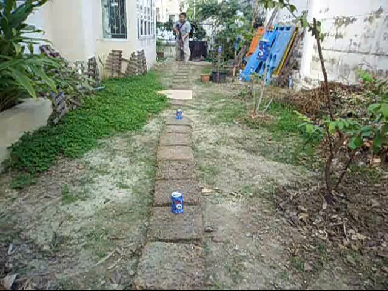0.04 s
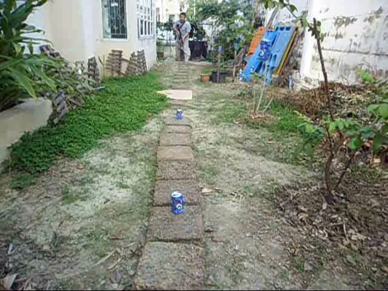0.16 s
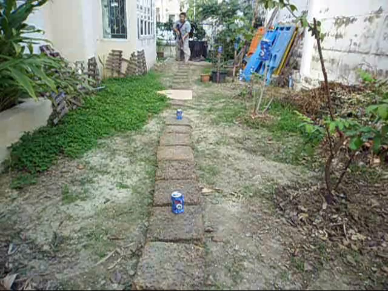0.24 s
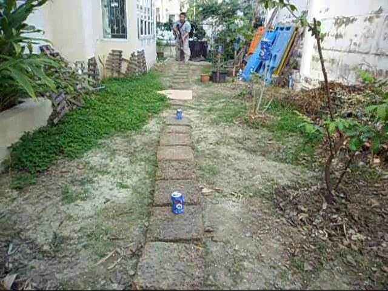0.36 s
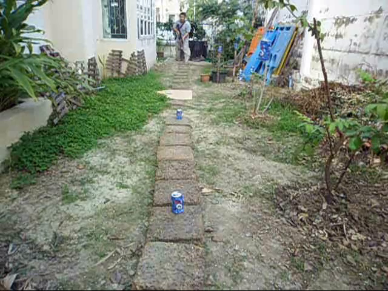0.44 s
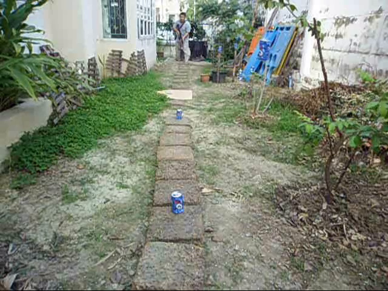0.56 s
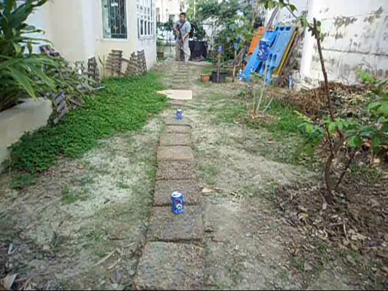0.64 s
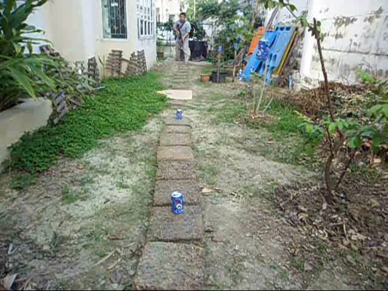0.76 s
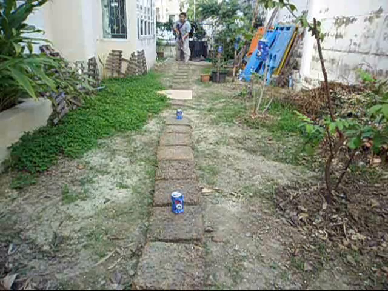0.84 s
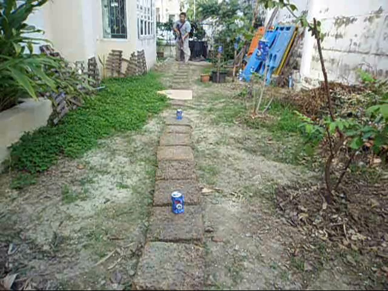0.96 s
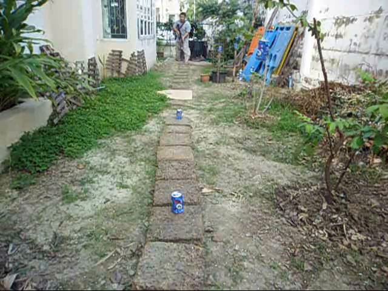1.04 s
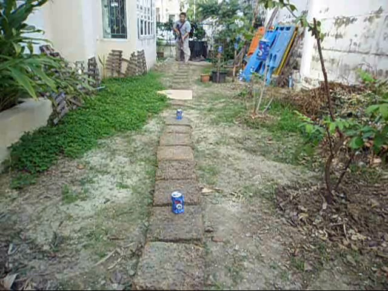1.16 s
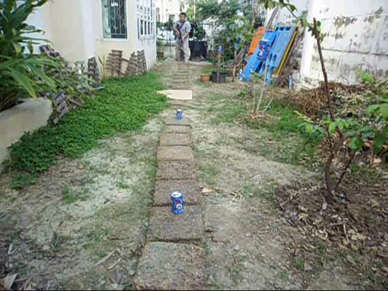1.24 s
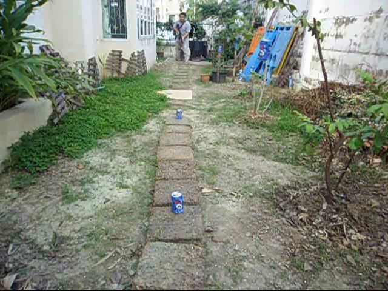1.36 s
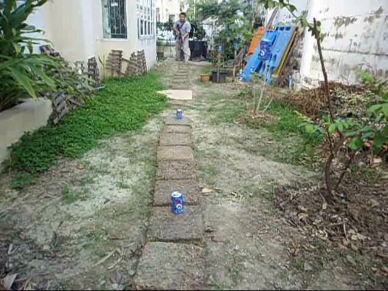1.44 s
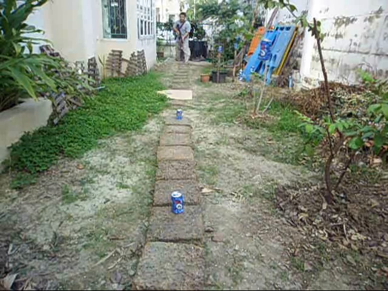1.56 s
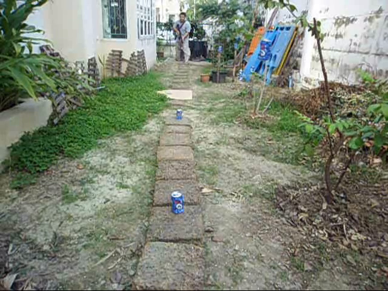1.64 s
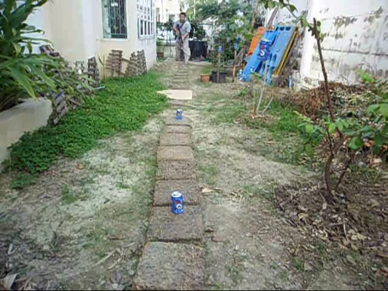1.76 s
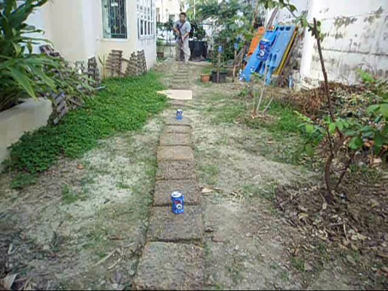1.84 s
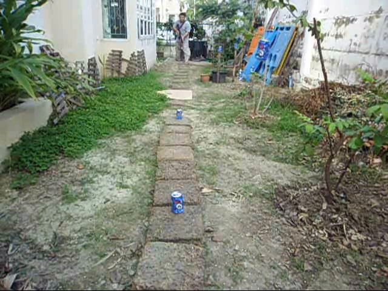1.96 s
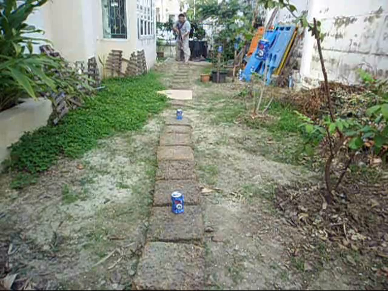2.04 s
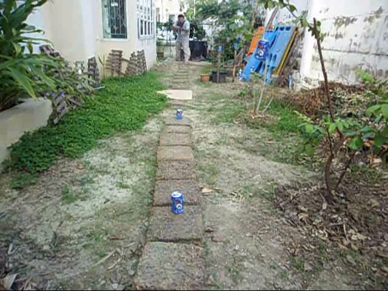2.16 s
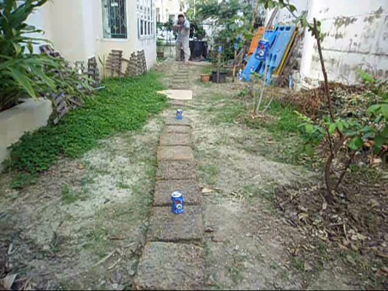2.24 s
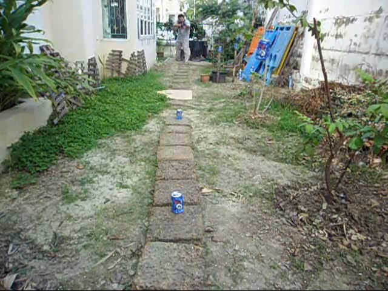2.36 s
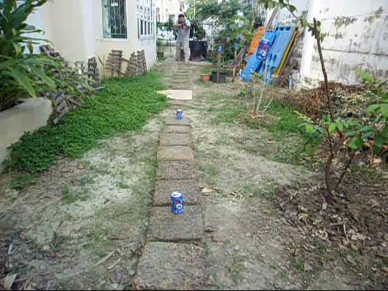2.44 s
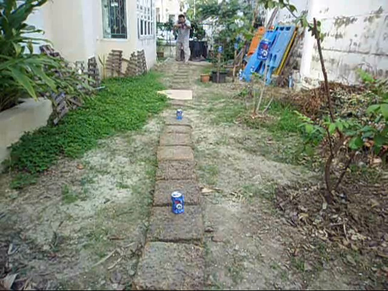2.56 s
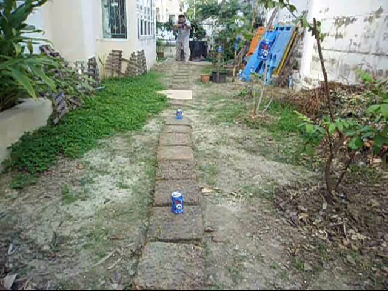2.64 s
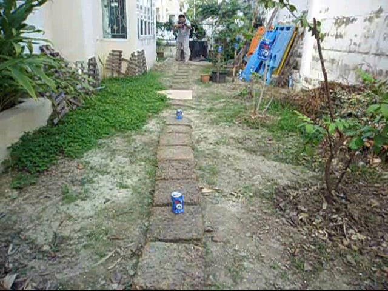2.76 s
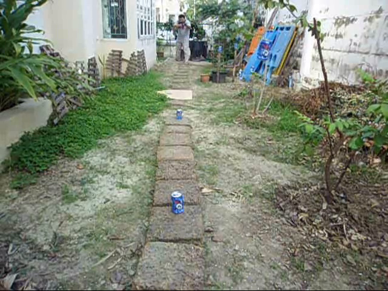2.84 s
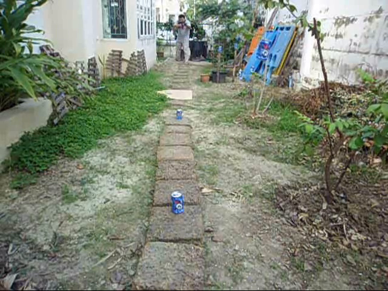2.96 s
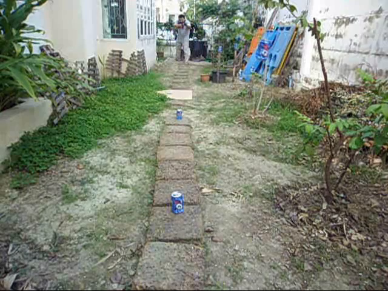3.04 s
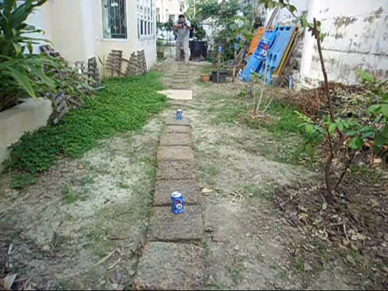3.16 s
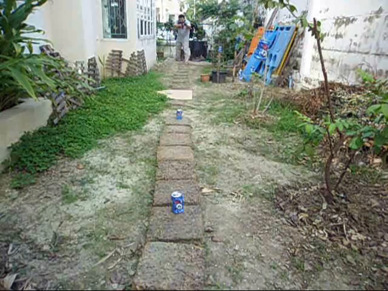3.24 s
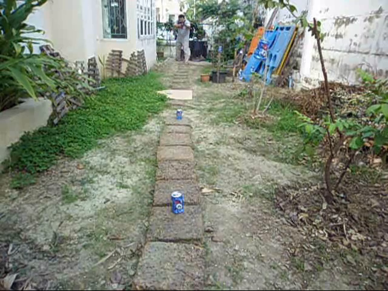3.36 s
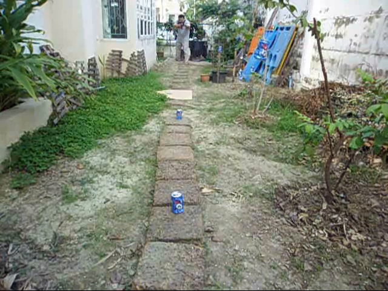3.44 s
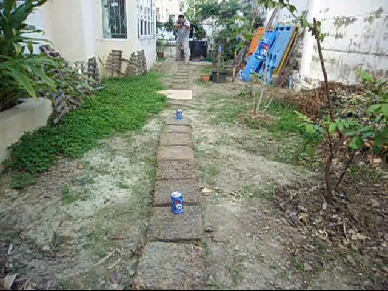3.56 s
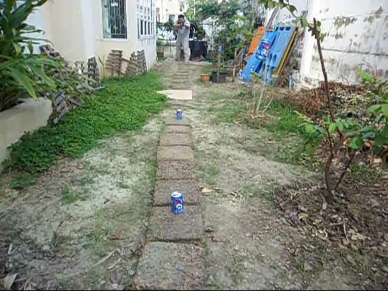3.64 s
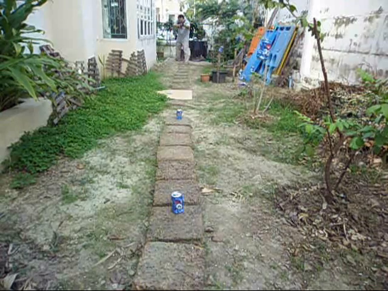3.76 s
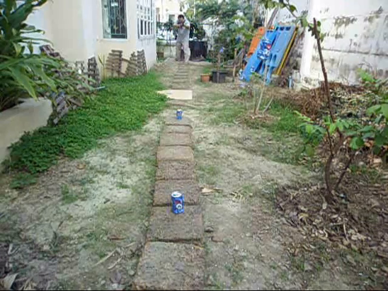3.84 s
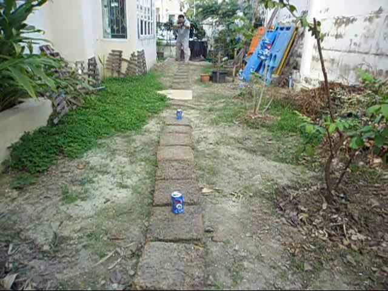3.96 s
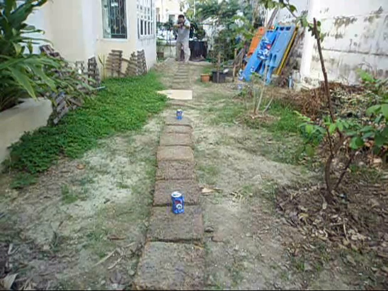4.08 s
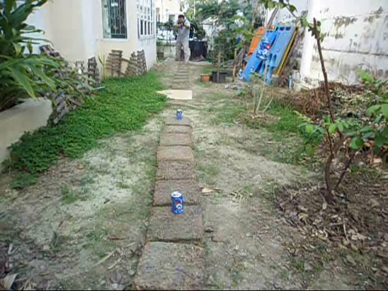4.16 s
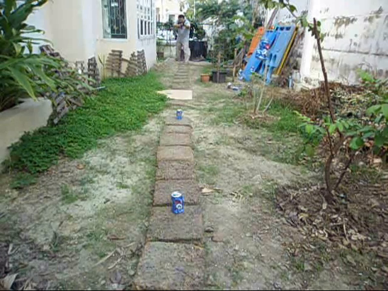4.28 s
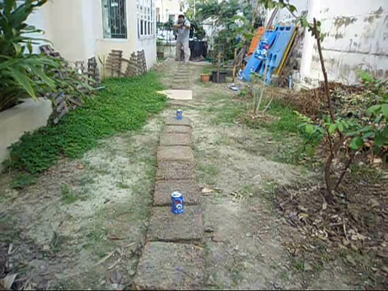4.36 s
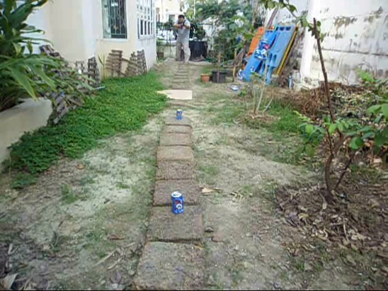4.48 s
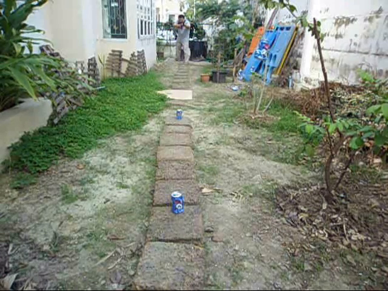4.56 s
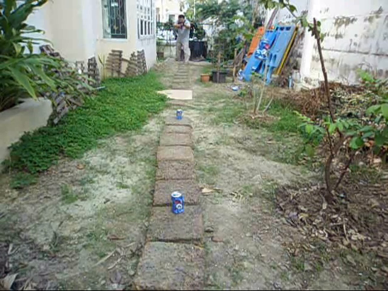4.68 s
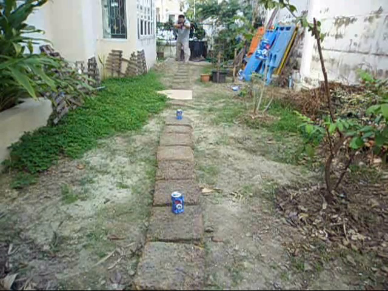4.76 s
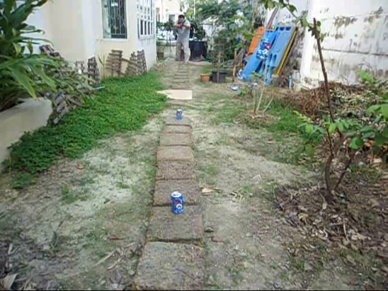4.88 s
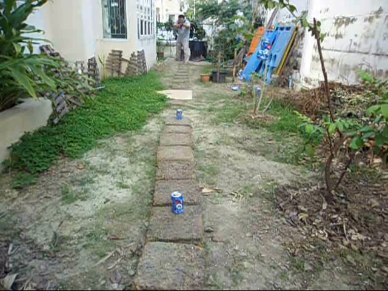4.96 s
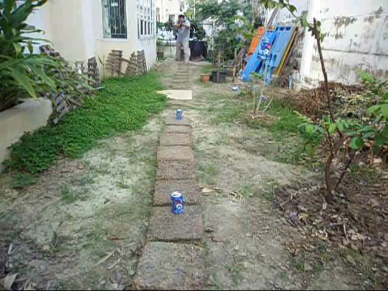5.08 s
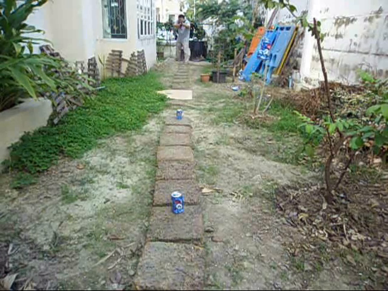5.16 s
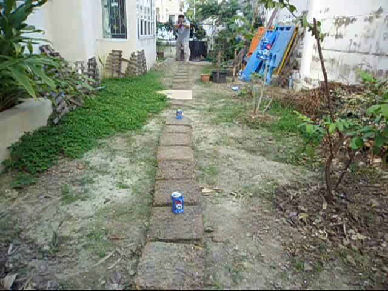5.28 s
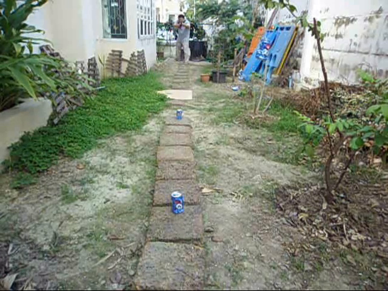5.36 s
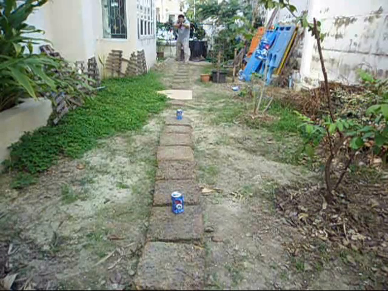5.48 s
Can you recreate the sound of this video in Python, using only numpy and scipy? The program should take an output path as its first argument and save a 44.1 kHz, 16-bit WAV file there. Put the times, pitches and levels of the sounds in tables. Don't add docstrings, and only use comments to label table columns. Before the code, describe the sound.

A small mono microphone in a narrow walled yard picks up a low fan hum, soft wind and a faint insect drone. Cloth rustles and fittings clink as a rifle is raised. Then five single electric airsoft shots snap out, most cracking loudly onto cans or sheet metal, distorting and ringing off the walls. Knocked cans clatter, a can rolls and pellets bounce before a duller last shot.

```python
import sys
import numpy as np
from scipy import signal
from scipy.io import wavfile

SR = 44100
rng = np.random.default_rng(int(sys.argv[2]) if len(sys.argv) > 2 else 0)


def convert_level_to_amplitude(level_db):
    exponent = np.asarray(level_db, float) / 20
    return 10 ** exponent


def unload_wav(signal):
    wavfile.write(
        sys.argv[1],
        SR,
        np.round(np.clip(np.atleast_2d(signal).T, -1, 1) * 32767).astype(np.int16),
    )


N = 242991

# (time [s], peak [dB], brightness [dB per octave], wall echo [dB], body [dB])
PISTON_SLAPS = [
    (3.3288, -1.5, 0.0, -7, 0.0),
    (3.8570, -.5, 4.0, -6, -3.0),
    (4.3012, -3.5, 0.0, -6.5, 0.0),
    (4.7230, -.5, 3.5, -5.5, -2.0),
    (5.4818, -5.5, 0.3, -2.5, 0.0),
]
# (time [s], peak [dB], brightness [dB per octave], wall echo [dB], body [dB])
PELLET_STRIKES = [
    (3.3475, 6, .5, -1, 1),
    (3.875, 9, 1, -1.5, 0.5),
    (4.3283, -7.5, -2, 1.5, -2),
    (3.984, -9, 1.5, -16, 0.0),
    (4.342, 2.5, 4, -10, 2.5),
    (4.7499, 7, -1.5, -2, 0.5),
]
# (time [s], peak [dB], brightness [dB per octave], wall echo [dB], body [dB])
BOUNCES = [
    (2.357, -23, 3, -14, -8),
    (3.266, -24, -2, 2, 5),
    (5.176, -6, -0.8, -6, -3),
    (5.195, -18.5, -1.4, -7, -3),
    (5.2385, -12, -2.5, -4, 9.5),
    (5.418, -19, -1, -1, -3.0),
]
# (time [s], peak [dB], brightness [dB per octave], wall echo [dB], body [dB])
TUMBLES = [
    (3.781, -8, .5, -1, 1.5),
    (3.820, -14, -1, 1.5, -2),
    (3.583, -28, 2, 6, -13),
    (3.618, -24, 0.5, 1.5, -13),
    (3.633, -18, -0.5, -5, -13),
    (4.608, -30.5, -0.5, 5.5, 8.5),
    (4.654, -28, -2, -0.5, 5.5),
    (4.50, -27, -2.5, 3.5, 4),
    (4.12, -25, -1, 1.5, -17),
]
REBOUND_TIMES = [
    4.3614,
    4.3874,
    4.402,
]
# (frequency [Hz], level [dB per Hz])
SLAP_COLOUR = [(88, -1), (150, -7), (338, -8.5), (1340, -3.5), (1760, -3), (2440, -4), (3810, -1),
               (4810, 1), (6430, -3), (8120, 0), (10900, -7.5), (15400, -13.5)]
# (frequency [Hz], level [dB per Hz])
CRACK_COLOUR = [(88, -6), (150, -10), (560, -10.5), (605, -5), (654, -8.5), (1370, -2), (2090, -4),
                (5300, -1), (7960, -2), (10400, -6.5), (15400, -22)]
# (frequency [Hz], t60 [s])
YARD_T60 = [(150, 0.21), (500, 0.46), (1200, 0.64), (3000, 0.58), (6000, 0.42), (10000, 0.46),
            (15000, 0.77)]
# (frequency [Hz], level [dB])
FAR_WALLS = [(150, -16.5), (400, -25.5), (1000, -16.5), (4000, -28.5), (15000, -30)]
# (time [s], blow [dB], modes (frequency [Hz], level [dB], t60 [s]))
CANS = [
    (3.35, -8.5, [(924, -4, .3), (1200, -4.5, 0.6), (1413, 1.5, 0.25), (2520, 3, 0.1), (3499, 0.5, 0.37), (5300, -10, .2)]),
    (3.578, -28, [(2280, 0.0, .5), (3235, -6, .4)]),
    (3.622, -25, [(2060, -1, .3), (2180, -4, .25), (3235, -3, .35), (5500, -4, .2), (1545, -3, .1), (4000, -3, .3), (3400, -3, .3)]),
    (3.786, -18, [(925, 2, .15), (1028, -2, 0.34), (2094, -9, 0.37), (3890, 8, 0.14), (5141, 2, 0.15)]),
    (3.879, -7.5, [(110, 2, 0.093), (855, -7, 0.44), (1030, -11.5, 0.78), (1520, -9.5, 0.76), (3240, 0, 0.22), (3977, -1.5, 0.23), (5250, -2.5, 0.43)]),
        (4.343, -16.5, [(1303, -3, 0.31), (2148, -14, 0.43), (3343, -4, 0.5), (3436, 2, .45), (1012, -11, 0.66), (5087, 0, 0.15), (680, -2, .2)]),
    (4.61, -26.5, [(1150, 0, .1), (3600, -12, 0.4), (6700, -7, 0.17), (8900, -9, 0.11)]),
    (4.75, -8, [(127, -4.5, 0.087), (1046, -7.5, 0.42), (1346, 3, 0.43), (1572, -1.5, 0.54), (2130, -3.5, 0.43), (3447, 0, 0.33)]),
    (5.24, -26, [(772, -5, 1), (976, -8, 0.42), (1494, 1, 0.16), (603, -8, 0.49)]),
]
# (frequency [Hz], level [dB], t60 [s])
RIFLE_BODY = [(2400, -4, .09), (4350, -3, .1), (4900, -2, .1), (10900, -6, .1)]
# (end time [s], length [s], starting level [dB])
WINDING = [
    (3.319, 0.047, -30.5),
    (3.776, .04, -44),
    (4.291, 0.046, -31),
    (4.714, 0.051, -34),
    (5.472, 0.049, -34),
]
# (frequency [Hz], width [Hz], starting level [dB], change as the spring loads [dB])
GEAR_RESONANCES = [(3300, 450, -11, 11.0), (4300, 1400, -3, 0.5), (5250, 300, 6.0, -15.0),
                   (10700, 700, -2, -8.0)]
# (time [s], blow [dB], modes (frequency [Hz], level [dB], t60 [s]))
CLINKS = [
    (0.7229, -50, [(5300, 1, 0.02), (9000, 1, .02)]),
    (2.222, -37, [(7280, 2, .08), (9000, 1, .08), (4700, -5, .06)]),
    (2.357, -33, [(3150, -3, 0.11), (4550, -1, .04), (4950, -2, 0.038), (7570, -6, 0.065), (8480, -6, 0.068), (11000, -5, .03), (12870, -9, .05)]),
    (2.401, -42, [(6750, 0, .1), (9300, 0, 0.09), (4500, -5, .15)]),
    (2.795, -46, [(2400, -4, .06), (4500, -4, 0.06)]),
]
# (time [s], held [s], level [dB])
SQUEAK = [
    (2.16, .035, -43.5),
]
# (time [s], held [s], level [dB])
ROLL_TURNS = [
    (5.056, .03, -31.5),
    (5.24, .03, -32),
    (5.36, .11, -44),
]
# (time [s], held [s], level [dB])
RUSTLES = [
    (2.16, 0.037, -35.5),
    (2.36, .06, -50.5),
    (2.47, .13, -52.5),
    (2.63, 0.25, -46.5),
]
# (frequency [Hz], level [dB per Hz])
CLOTH_COLOUR = [(470, -27), (800, 2), (1100, 0), (1770, -11), (2470, -0.5), (4810, 0), (7980, 0),
                (10100, -3), (15400, -13)]
# (frequency [Hz], width [Hz], level [dB])
BUCKLE = [(4500, 150, -18), (5800, 120, -15), (7200, 120, -17), (10400, 200, -24)]
# (time [s], frequency [Hz], level [dB])
WINGBEAT = [(0.0, 216.5, -57), (0.2, 215.4, -55.5), (1.0, 214.5, -56), (2.0, 215, -53.5), (2.4, 217.4, -57),
            (2.65, 216, -62), (2.95, 216.5, -64), (3.2, 217, -65)]
# (multiple of the wingbeat, level [dB])
WING_OVERTONES = [(1, 6.5), (2, 5), (3, -1.5), (4, -2), (5, -1), (6, -8), (7, -4), (9, 0), (10, -2),
                  (15, -5)]
# (time [s], frequency [Hz], level [dB])
FAN_HUM = [(0.0, 91.8, -31.5), (1.0, 92.3, -29), (1.9, 92, -31), (2.7, 93.4, -27.5), (3.4, 93.9, -30.5),
           (3.8, 92.1, -28), (4.3, 91.5, -27.5), (4.6, 92.3, -31.5), (5.51, 91.2, -28.5)]
# (time [s], held [s], level [dB],
# frequency [Hz])
PANEL_WHINE = [
    (.1, .8, -60, 460),
    (1.71, 0.47, -47.5, 461.3),
    (2.33, 0.046, -52.5, 452),
    (2.47, .07, -46.5, 471),
    (2.66, 0.045, -50, 466),
    (2.8, .45, -54, 435),
]
# (time [s], level [dB])
WIND_GUSTS = [(0.0, -37), (.8, -36.5), (2.1, -39), (2.6, -42), (3.9, -38.5), (4.3, -41), (5.51, -36)]
# (frequency [Hz], level [dB per Hz])
AIR_COLOUR = [(12, -41), (20, -11), (44, -10), (72, -1), (98, 0), (119, -13), (161, -19.5), (219, -26),
              (289, -26.5), (438, -22.5), (517, -28.5), (1070, -31), (1160, -31), (1970, -34.5),
              (15400, -49.5)]
BAND_EDGES = 110 * 2 ** np.arange(0, 7.4, 1 / 3)


def rms_one(x):
    return x / np.sqrt(np.mean(x ** 2) + 1e-20)


def in_time(rows):
    s, *columns = np.transpose(rows)
    return [np.interp(np.arange(N) / SR, s, column) for column in columns]


def gated(rows):
    before, after = (rows[0][0] - .004, -120), (rows[-1][0] + .004, -120)
    return convert_level_to_amplitude(in_time([before] + list(rows) + [after])[0])


def swells(rows, rise, fall):
    s, held, level_db = np.transpose(rows)[:3, :, None]
    t = np.arange(N) / SR - s
    return convert_level_to_amplitude(level_db + rise * np.minimum(t, 0) - fall * np.maximum(t - held, 0))


def at_hz(points, hz):
    table_hz, values = np.array(points)[:, 0], np.array(points)[:, 1]
    return np.interp(np.log(hz), np.log(table_hz), values)


def drift(rate):
    r = np.exp(-40 * np.pi * rate / SR)
    chance = rng.standard_normal(N // 20 + 4002)
    slow = signal.lfilter([1], [1, -2 * r, r * r], chance)[4000:]
    return np.interp(np.arange(N) / 20, np.arange(len(slow)), rms_one(slow))


def resonate(x, hz, width):
    r = np.exp(-np.pi * width / SR)
    top = np.array([1, 0, -1]) * (1 - r * r) / 2
    return signal.lfilter(top, [1, -2 * r * np.cos(2 * np.pi * hz / SR), r * r], x)


def noise_bands(patchy_db, rate):
    white = rng.standard_normal((2, N))
    hz = np.sqrt(BAND_EDGES[:-1] * BAND_EDGES[1:])
    bands = []
    for k, (low, high) in enumerate(zip(BAND_EDGES, BAND_EDGES[1:])):
        band_pass = signal.butter(2, [low, high], "band", fs=SR, output="sos")
        bands.append(signal.sosfilt(band_pass, white[k % 2]) * convert_level_to_amplitude(patchy_db * drift(rate)))
    return hz[:, None], np.array(bands)


def struck(s, modes, level_db, blur_hz):
    out, t, i = np.zeros(N), np.arange(round(.6 * SR)) / SR, round(s * SR)
    hz, mode_db, t60 = np.transpose(modes)[:, :, None]
    r = np.exp(-np.pi * blur_hz / SR)
    chance = rng.standard_normal((2, len(modes), len(t) + 3000))
    waver = signal.lfilter([1], [1, -2 * r, r * r], chance[0] + 1j * chance[1])[:, 3000:]
    waver = waver / np.sqrt(np.mean(abs(waver) ** 2, axis=1, keepdims=True))
    decay = convert_level_to_amplitude(level_db + mode_db - 60 * t / t60)
    rings = decay * np.imag(waver * np.exp(2j * np.pi * hz * t))
    soft_start = np.minimum(t / .001, 1)
    out[i:i + len(t)] = (np.sum(rings, axis=0) * soft_start)[:N - i]
    return out


def blow_power(events, t60, spectrum, hz, level_db, rise_s, hold_s, build_s):
    power, t = np.zeros((len(hz), N)), np.arange(round(1.2 * SR)) / SR
    colour = convert_level_to_amplitude(2 * at_hz(spectrum, hz))
    band_share = hz * 2 * (2 ** (1 / 6) - 2 ** (-1 / 6)) / SR
    colour = colour / np.sum(colour * band_share)
    body = np.exp(-(np.log2(hz / 1090) / 0.61) ** 2)
    near = convert_level_to_amplitude(-120 * t / at_hz(YARD_T60, hz))
    far = convert_level_to_amplitude(2 * at_hz(FAR_WALLS, hz) - 120 * t / 2.16)
    echoes = (1 - np.exp(-t / build_s)) * (near + far)
    rise = np.minimum(t / rise_s, 1) ** 2
    burst = convert_level_to_amplitude(-120 * np.maximum(t - hold_s, 0) / max(t60, .005))
    for s, peak_db, tilt_db, echo_db, body_db in events:
        i = round(s * SR)
        slope_db = tilt_db * np.log2(np.maximum(hz, 800) / 4000)
        slope_db = np.where(hz > 4000, np.minimum(slope_db, 0), slope_db)
        gain = colour * convert_level_to_amplitude(2 * (peak_db + level_db + slope_db + body_db * body))
        blow = gain * rise * (burst + convert_level_to_amplitude(2 * echo_db) * echoes)
        power[:, i:i + len(t)] += blow[:, :N - i]
    return power


def blows():
    hz, bands = noise_bands(patchy_db=-0.5, rate=12.0)
    rebounds = [(s, -2.5 - k * 3.3, 2.0, -13, .8) for k, s in enumerate(REBOUND_TIMES)]
    power = blow_power(PISTON_SLAPS, .012, SLAP_COLOUR, hz,
                       level_db=.5, rise_s=.0003, hold_s=.0075, build_s=.002)
    for events, t60 in (PELLET_STRIKES, 0.18), (rebounds, .028):
        power += blow_power(events, t60, CRACK_COLOUR, hz,
                            level_db=-5.5, rise_s=.0008, hold_s=0.0047, build_s=0.0023)
    power += blow_power(TUMBLES, 0.042, SLAP_COLOUR, hz,
                        level_db=-1.5, rise_s=.008, hold_s=.009, build_s=.01)
    power += blow_power(BOUNCES, 0.098, SLAP_COLOUR, hz,
                        level_db=-14.5, rise_s=0.0006, hold_s=0.00087, build_s=0.019)
    flutter = convert_level_to_amplitude(.7 * drift(200))
    cans = sum(struck(s, modes, blow_db, blur_hz=30) for s, blow_db, modes in CANS)
    rifle = sum(struck(shot[0], RIFLE_BODY, shot[1] - 7, blur_hz=200) for shot in PISTON_SLAPS)
    return flutter * np.sum(np.sqrt(power) * bands, axis=0) + cans + rifle


def gearbox():
    teeth, t = rng.standard_normal(N), np.arange(N) / SR
    load = sum(np.interp(t, [end - length, end + .012], [0, 1], right=0) for end, length, _ in WINDING)
    whine = sum(convert_level_to_amplitude(db + change_db * load) * rms_one(resonate(resonate(teeth, hz, width), hz, width))
                for hz, width, db, change_db in GEAR_RESONANCES)
    grind = rms_one(resonate(teeth, 1700, 7300))
    wound_db = -24
    level = sum(gated([(end - length, db), (end, wound_db), (end + .008, wound_db + 3.5)])
                for end, length, db in WINDING)
    return level * np.minimum(4 * load, 1) * (.36 * whine + .8 * grind)


def handling():
    squeak = swells(SQUEAK, 1000, 1000)[0] * rms_one(resonate(rng.standard_normal(N), 1650, 150))
    return sum(struck(s, modes, blow_db, blur_hz=120) for s, blow_db, modes in CLINKS) + squeak


def rolling():
    grit = rng.standard_normal(N) * convert_level_to_amplitude(1.9 * drift(40.6))
    hollow = rms_one(resonate(resonate(grit, 410, 300), 400, 410))
    return np.sum(swells(ROLL_TURNS, 380, 75), axis=0) * convert_level_to_amplitude(-4.0) * hollow


def insect():
    hz, level_db = in_time(WINGBEAT + [(3.4, 214, -87)])
    turns, s = np.cumsum(hz + 0.77 * drift(3.0)) / SR, np.arange(N) / SR
    stack = sum(convert_level_to_amplitude(db - 0.59 * (k - 1.5) * s + 2.8 * drift(3.5)) * np.sin(2 * np.pi * k * turns)
                for k, db in WING_OVERTONES)
    return convert_level_to_amplitude(level_db) * stack


def fan():
    hz, level_db = in_time(FAN_HUM)
    turns = np.cumsum(hz + 0.3 * drift(2.7)) / SR
    low = np.sqrt(2) * convert_level_to_amplitude(level_db + 1.56 * drift(5.7)) * np.sin(2 * np.pi * turns)
    panel_turns = np.cumsum(np.array(PANEL_WHINE)[:, 3:] + 1.0 * drift(6.0), axis=1) / SR
    panel = swells(PANEL_WHINE, 250, 200) * np.sin(2 * np.pi * panel_turns)
    return low + convert_level_to_amplitude(1 + 1.5 * drift(6)) * np.sum(panel, axis=0)


def cloth_and_air():
    hz, bands = noise_bands(patchy_db=1.5, rate=17.5)
    air = rms_one(np.sum(convert_level_to_amplitude(at_hz(AIR_COLOUR, hz)) * bands, axis=0))
    cloth = rms_one(np.sum(convert_level_to_amplitude(at_hz(CLOTH_COLOUR, hz)) * bands[:, ::-1], axis=0))
    buckle = sum(convert_level_to_amplitude(db) * rms_one(resonate(cloth, hz, width)) for hz, width, db in BUCKLE)
    movement = np.sum(swells(RUSTLES, 450, 90), axis=0)
    return convert_level_to_amplitude(-44) * air + movement * (cloth * convert_level_to_amplitude(1.1 * drift(79.6)) + buckle)


def wind():
    low_band = signal.butter(2, [24, 50], "band", fs=SR, output="sos")
    gust = signal.sosfilt(low_band, rng.standard_normal(N))
    return convert_level_to_amplitude(in_time(WIND_GUSTS)[0]) * rms_one(gust * convert_level_to_amplitude(1.9 * drift(4.0)))


def scene():
    action = blows() + gearbox() + handling() + rolling()
    background = insect() + fan() + cloth_and_air() + wind()
    return np.tile(action + background, (2, 1))


def roll_off(x):
    return signal.sosfilt(signal.butter(12, 15530, fs=SR, output="sos"), x)


def record(dry):
    notched = signal.lfilter(*signal.iirnotch(8010, 3.1, fs=SR), dry)
    clipped = np.clip(dry + 0.66 * (notched - dry), -1, 1)
    cut = signal.sosfilt(signal.cheby2(12, 60, 16600, fs=SR, output="sos"), clipped)
    finished = np.clip(cut, -1, 1)
    return roll_off(finished)


dry = scene()
out = record(dry)
unload_wav(out)
```